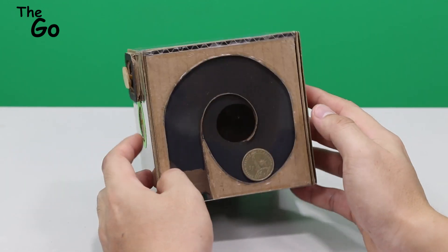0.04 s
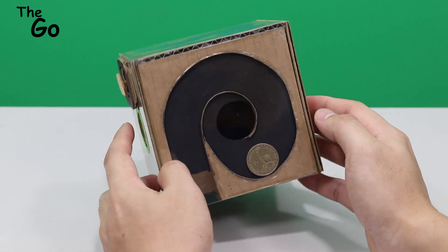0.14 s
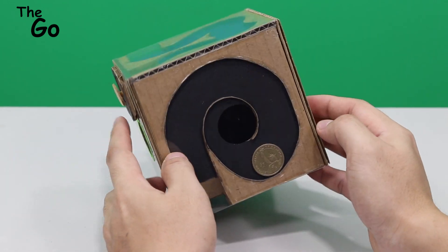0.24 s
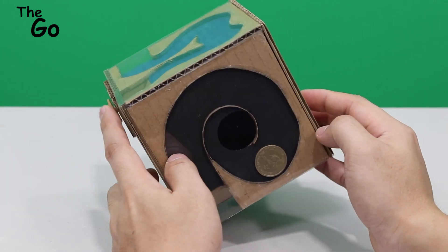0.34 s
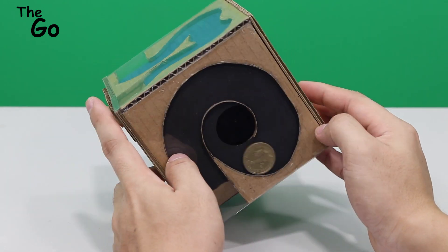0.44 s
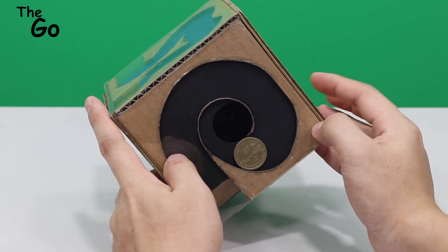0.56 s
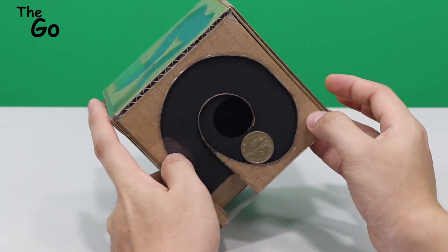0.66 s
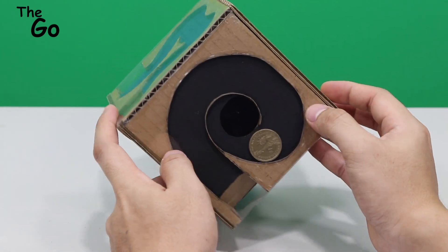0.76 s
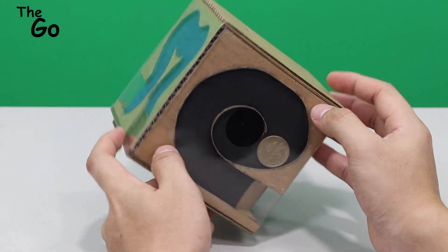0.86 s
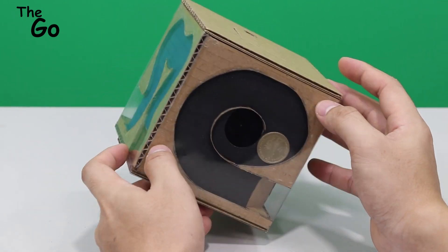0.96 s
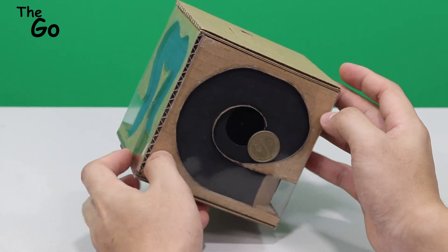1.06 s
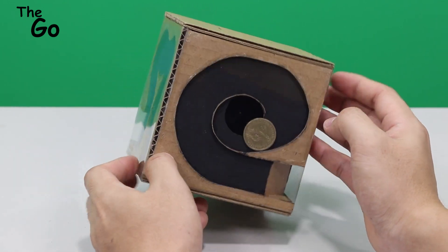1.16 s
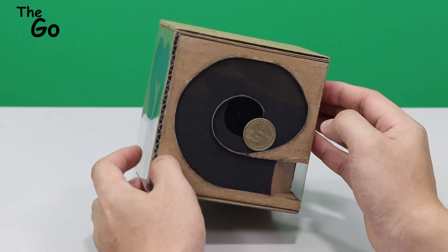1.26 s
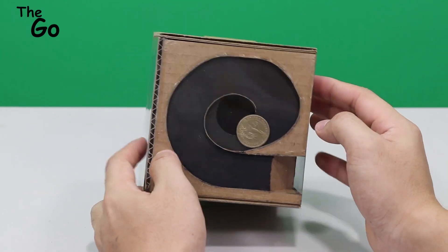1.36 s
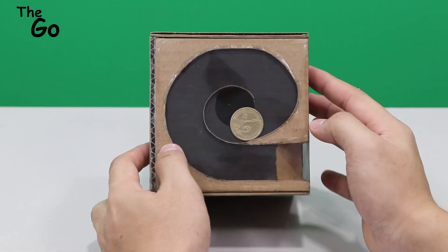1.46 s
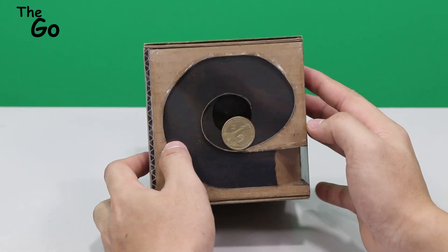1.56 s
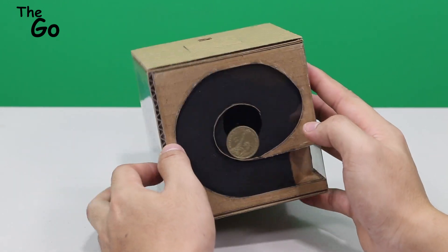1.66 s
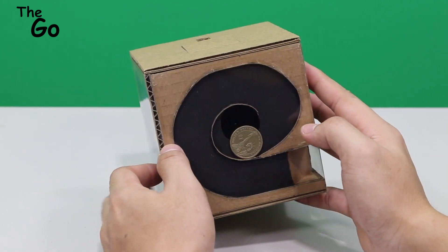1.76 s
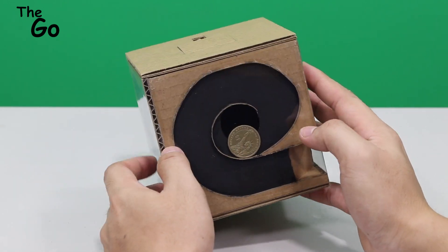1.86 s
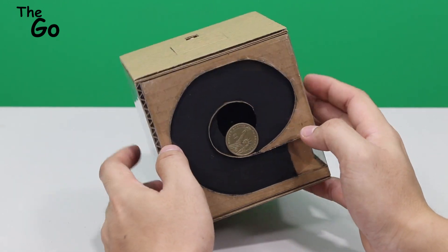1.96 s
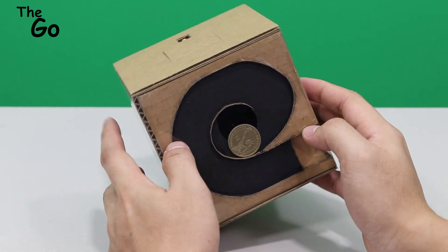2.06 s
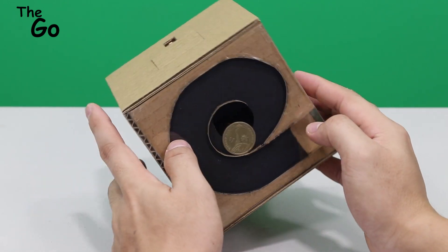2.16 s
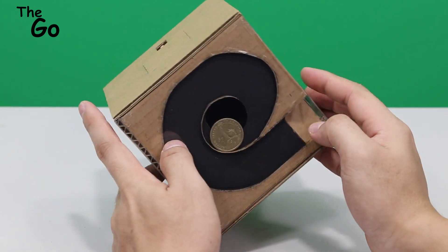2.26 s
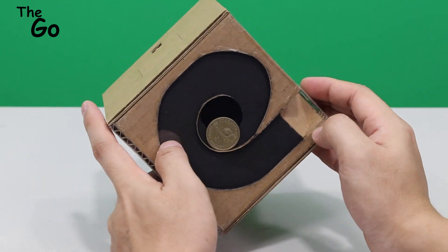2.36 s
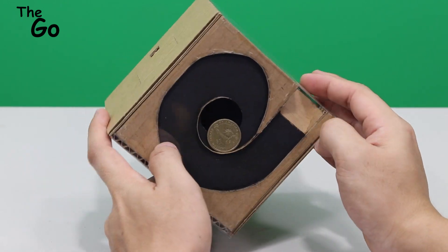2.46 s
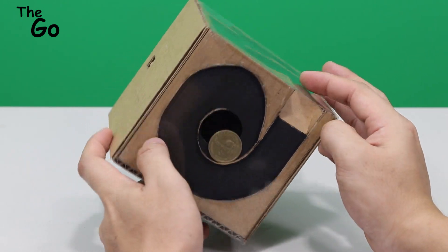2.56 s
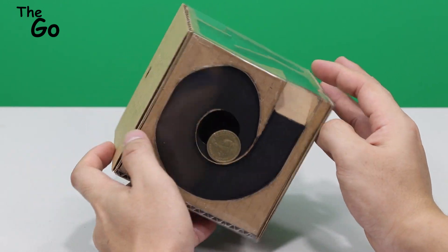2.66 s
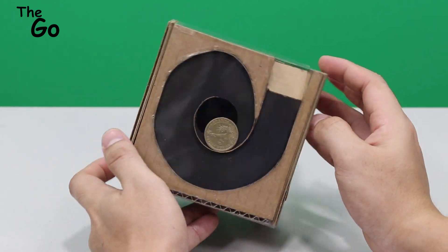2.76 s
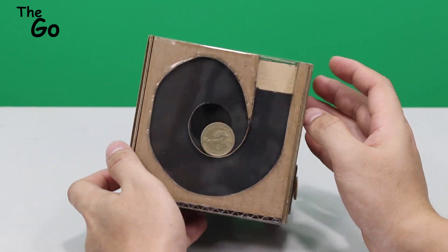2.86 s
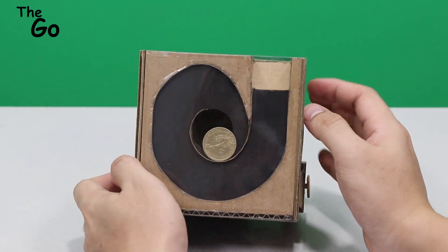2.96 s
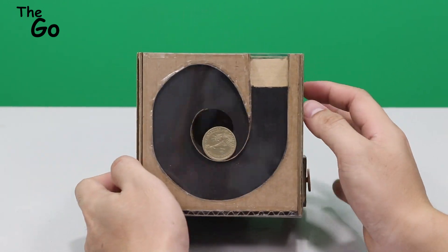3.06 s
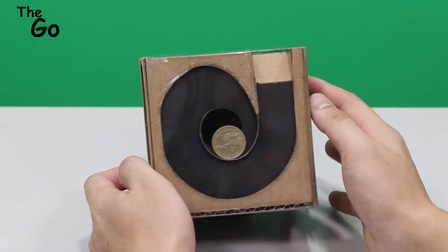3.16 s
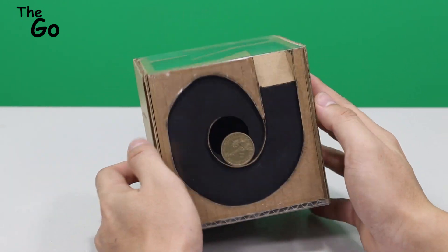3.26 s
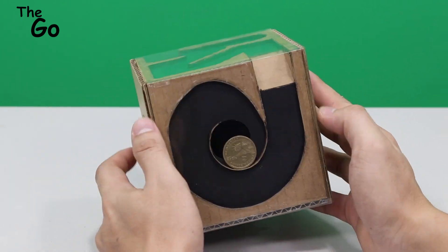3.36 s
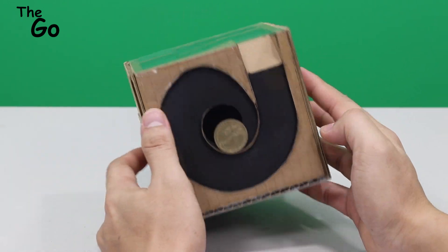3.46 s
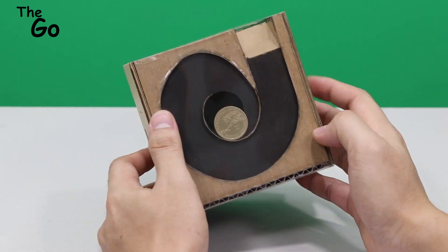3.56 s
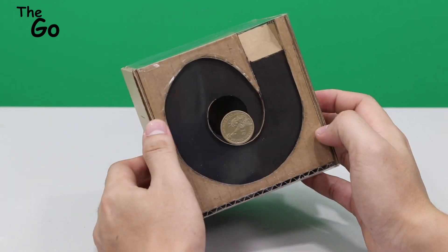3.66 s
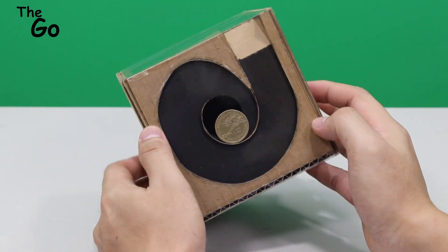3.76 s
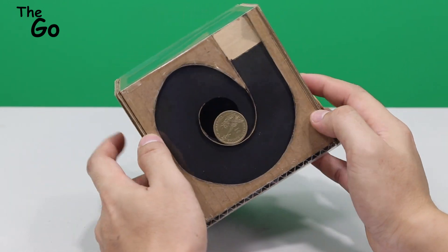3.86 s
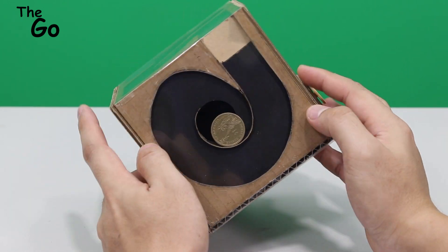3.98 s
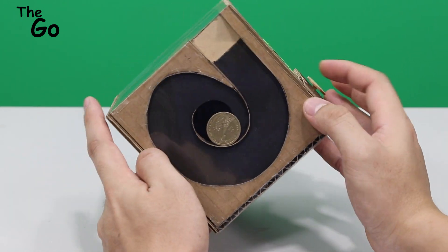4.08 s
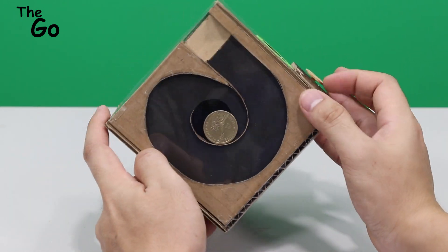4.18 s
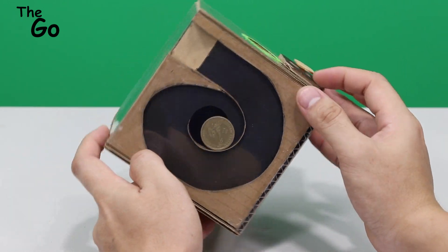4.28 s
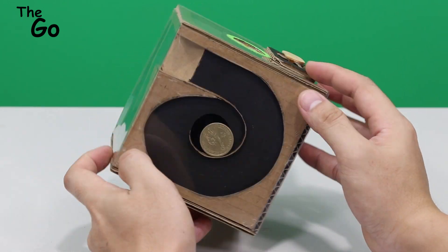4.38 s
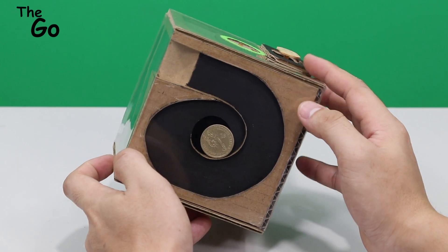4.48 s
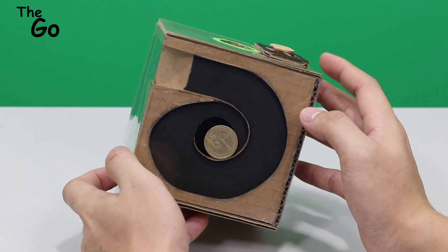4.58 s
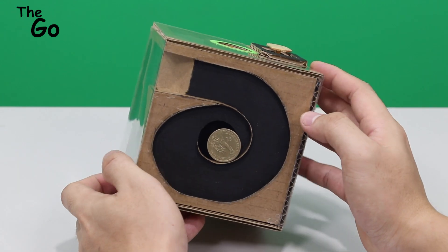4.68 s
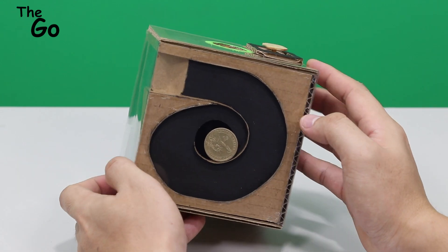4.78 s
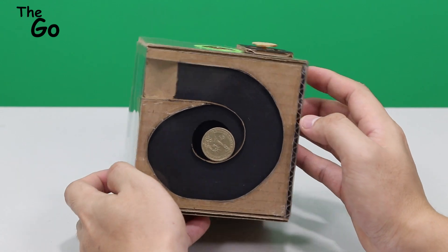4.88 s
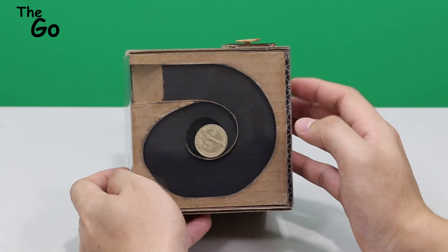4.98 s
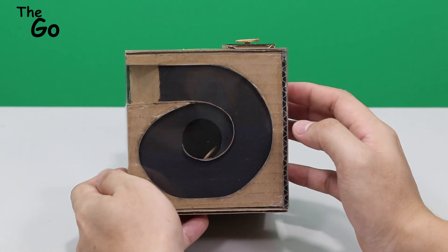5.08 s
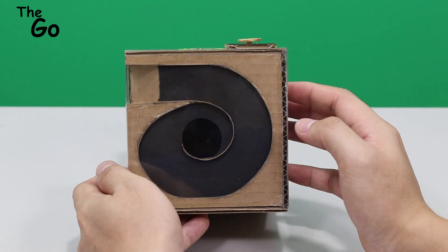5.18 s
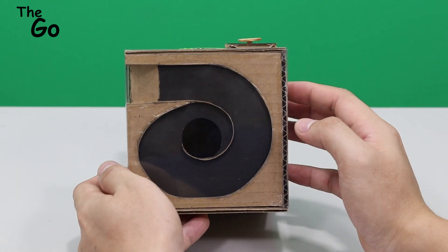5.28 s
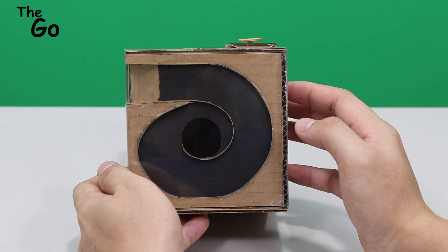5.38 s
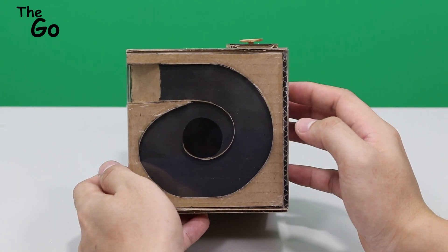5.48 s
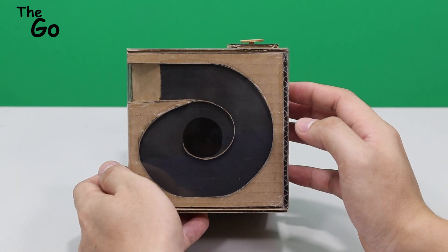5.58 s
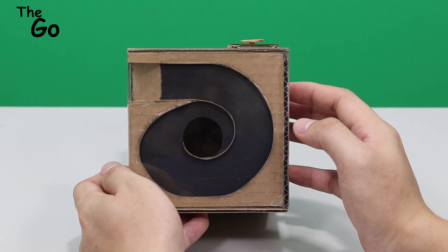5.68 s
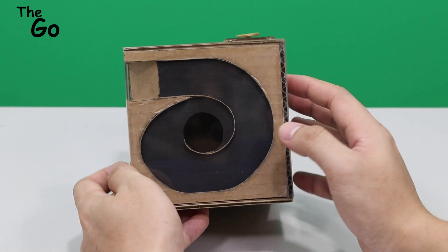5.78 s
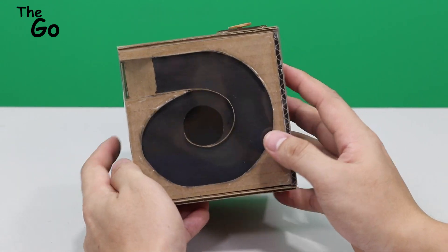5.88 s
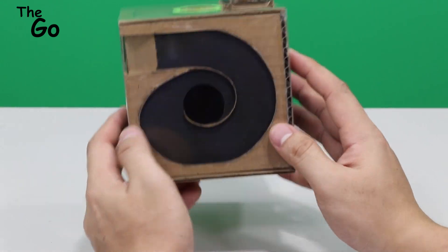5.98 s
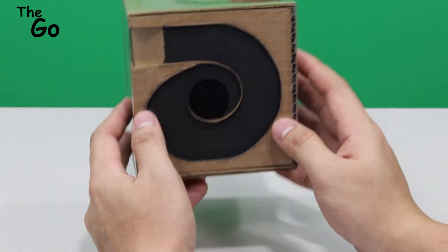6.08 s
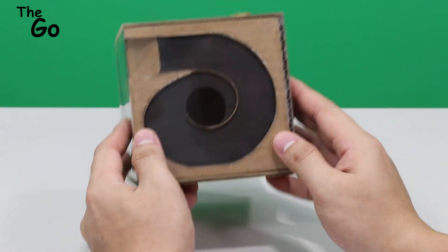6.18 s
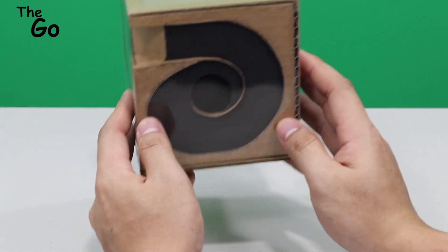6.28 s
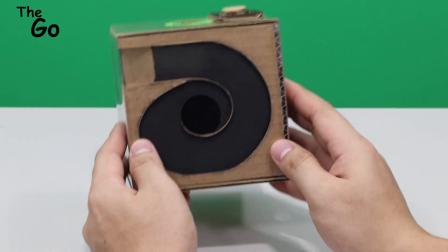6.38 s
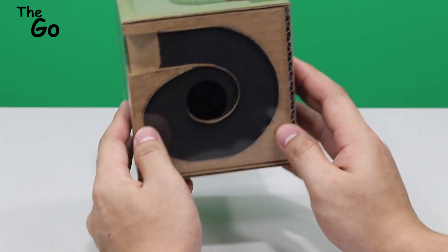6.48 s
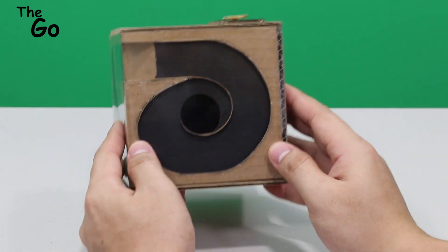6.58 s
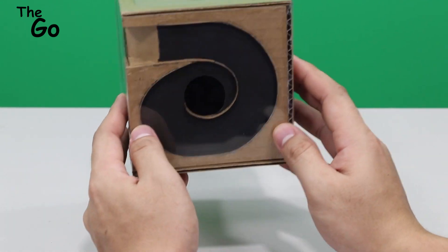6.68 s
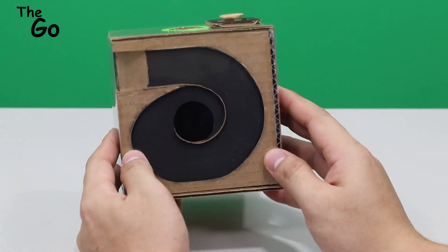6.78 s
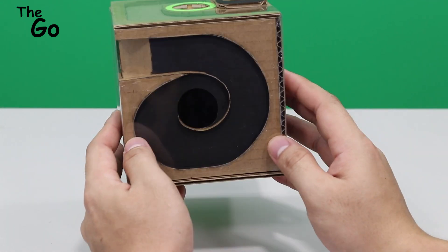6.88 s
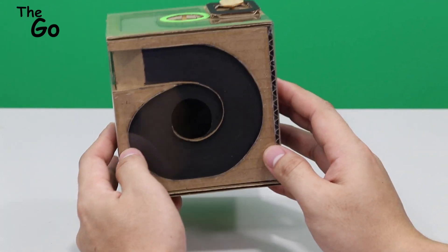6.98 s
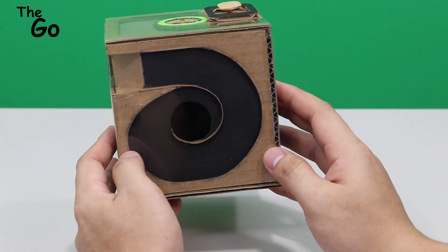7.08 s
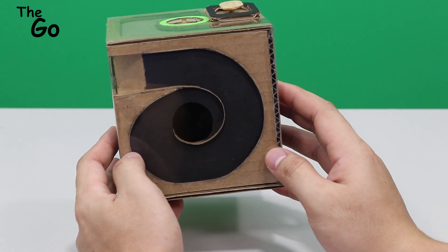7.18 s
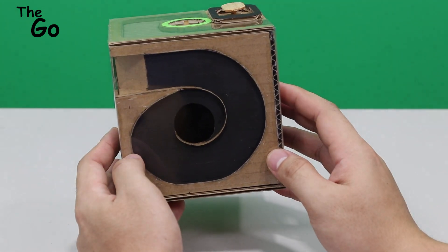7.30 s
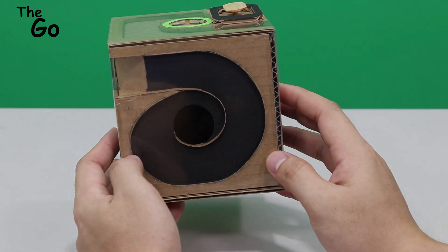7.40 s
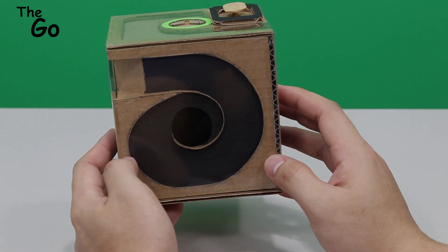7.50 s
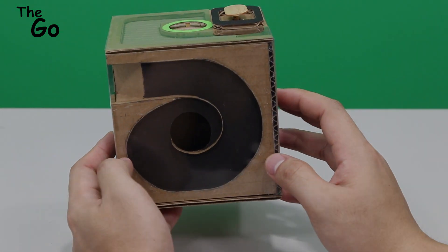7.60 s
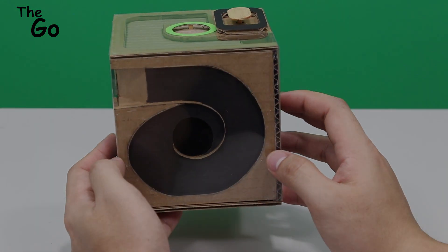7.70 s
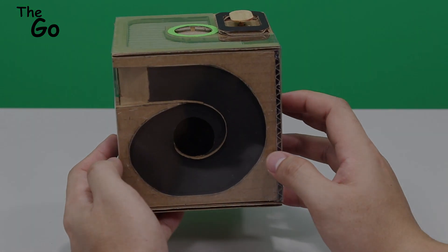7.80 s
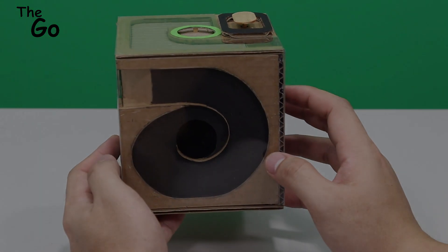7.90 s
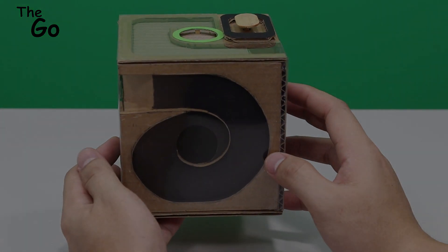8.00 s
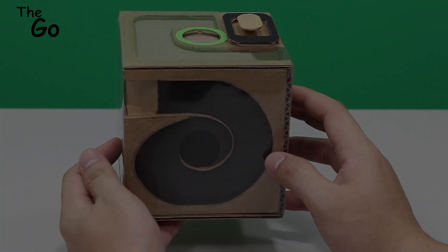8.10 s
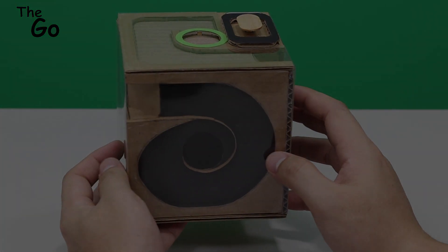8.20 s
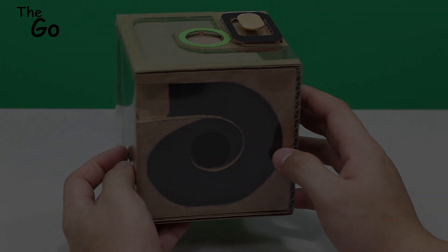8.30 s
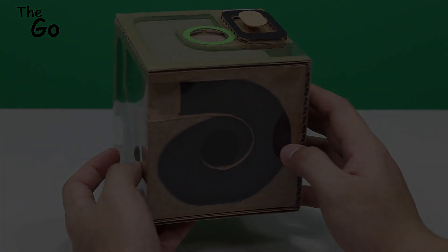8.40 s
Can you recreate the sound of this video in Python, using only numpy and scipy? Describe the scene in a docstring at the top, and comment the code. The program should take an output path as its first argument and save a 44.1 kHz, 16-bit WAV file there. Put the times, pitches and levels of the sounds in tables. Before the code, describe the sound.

Close, dry recording of a coin inside a small cardboard box in a bare room. An opening cluster of hollow knocks and brief rolling gives way to sparse taps and scuffs as hands tilt the box. A busy rattle comes midway, then a drop and tumble, then loud rapid shaking bursts that briefly clip. It dies away to low steady background noise.

```python
"""Bare room: a coin rolls, tips and knocks inside a cardboard box that two hands turn and then shake.
Knocks ring decaying wall and coin modes and crack as short noise bursts; rolling is dense grains into both.
The hands rumble as lumpy low noise; the room answers with decaying noise bands over steady background noise.
A slow gain control ducks the level after loud knocks; their first peaks overload."""
import sys
import numpy as np
from scipy import signal
from scipy.io import wavfile

SR = 44100
rng = np.random.default_rng(int(sys.argv[2]) if len(sys.argv) > 2 else 0)


def dump(signal):
    """Clip the signal to [-1, 1] and save it as 16-bit WAV at the path in sys.argv[1]."""
    limited = np.clip(np.atleast_2d(signal).T, -1, 1)
    pcm = np.round(limited * 32767).astype(np.int16)
    wavfile.write(sys.argv[1], SR, pcm)


def boost(x):
    """Linear amplitude factor 10**(x/20) for a level x in decibels (scalar or array-like)."""
    u = np.asarray(x, float) / 20
    return 10 ** u


N = 372644

# Box wall modes. Each row: frequency in Hz, relative level in dB, t60 in s.
WALL_MODES = [(176, -12, .07), (235, -9, .05), (300, -6, .05), (392, -1, .06), (490, -1, .04),
              (587, 0, .04), (666, 0, .04), (750, -1, .03), (930, -1, .025), (1080, -2, .02),
              (1180, -1, .018), (1295, -1, .015), (1440, -1, .016), (1720, 1, .022), (1950, 1, .01),
              (2250, 0, .012), (2720, 1, .014), (3300, -3, .006), (4200, -7, .005)]
# Coin modes, seven low then four high. Each row: frequency in Hz, relative level in dB, t60 in s.
COIN_MODES = [(7400, -4, .005), (8000, -4, .015), (8365, -11, .05), (8480, -8, .025), (8571, -13, .11),
              (8900, -2, .012), (9600, -2, .004), (14350, -1, .05), (14430, -1, .04), (14540, 0, .08),
              (14620, 0, .04)]
# Room response. Each row: frequency in Hz, t60 in s, left-right correlation from 0 to 1.
ROOM_BANDS = [(142, 0.6, 0.66), (373, 0.36, 0.86), (1060, 0.35, 0.46), (2750, 0.38, 0), (6480, 0.39, 0),
              (12600, 0.47, 0.6)]
LOW_COIN_MODES, COIN_SPLIT_HZ = 7, 11000


def rms_one(x):
    """Scale to unit rms."""
    return x / np.sqrt(np.mean(x ** 2) + 1e-20)


def ring(clicks, hz, t60_s):
    """Two-pole resonator: a unit click starts a decaying sine of height 1."""
    radius = boost(-60 / (t60_s * SR))
    w = 2 * np.pi * hz / SR
    return signal.lfilter([0, np.sin(w)], [1, -2 * radius * np.cos(w), radius * radius], clicks + 1e-18)


def near_hz(hz, centre_hz, width_octaves):
    """Gaussian weight of a mode by its distance in octaves from the centre."""
    return np.exp(-.5 * (np.log2(hz / centre_hz) / width_octaves) ** 2)


def by_hz(rows, column):
    """Column of a table as a function of frequency, on a log axis."""
    rows = np.array(rows)
    return lambda hz: np.interp(np.log(hz), np.log(rows[:, 0]), rows[:, column])


def bands(length, level_db, likeness, t60_s=None):
    """Half-octave bands of stereo noise, each with its level, left-right correlation and optional decay."""
    out = 0
    edges_hz = 22 * 2 ** np.arange(0, 9.6, .5)
    t = np.arange(length) / SR
    white = rng.standard_normal((2, 2, length))
    for k, (low_hz, high_hz) in enumerate(zip(edges_hz, edges_hz[1:])):
        band = signal.butter(2, [low_hz, high_hz], "band", fs=SR, output="sos")
        mid, side = signal.sosfilt(band, white[k % 2])
        hz = np.sqrt(low_hz * high_hz)
        alike = np.clip(likeness(hz), 0, 1)
        decay_db = 60 * t / t60_s(hz) if t60_s else 0
        stereo = np.sqrt(1 + alike) * mid + np.sqrt(1 - alike) * side * [[1], [-1]]
        out = out + boost(level_db(hz) - decay_db) * stereo
    return out


def grains(per_s, spread_db):
    """Uneven clicks of random sign and time; rms 1."""
    size_db = spread_db * np.minimum(rng.exponential(1, N), 5)
    sizes = boost(size_db) * rng.choice([-1, 1], N)
    return rms_one(sizes * (rng.random(N) < per_s / SR))


def papery(x):
    """Bright colour of card: no bass, a fall in the treble; rms 1."""
    x = signal.sosfilt(signal.butter(2, 1500, "high", fs=SR, output="sos"), x)
    return rms_one(signal.lfilter(*signal.butter(2, 3400, fs=SR), x) + boost(-20) * x)


def swells(start_s, length_s, level_db, rise_db_s, fall_db_s):
    """Summed gain of gestures that rise, hold and fall away, straight in dB."""
    t = np.arange(0, N, 32)[None] / SR
    early_s = np.maximum(start_s[:, None] - t, 0)
    late_s = np.maximum(t - (start_s + length_s)[:, None], 0)
    gain = boost(level_db[:, None] - rise_db_s * early_s - fall_db_s * late_s).sum(axis=0)
    return np.interp(np.arange(N) / SR, t[0], gain)


def strike(at, heights, chatter):
    """Stereo click train: each contact chatters and leans in level to the left or right."""
    clicks = np.zeros((2, N + SR))
    lags, sizes, lean_db = chatter
    for lag, size in zip(lags.T, sizes.T):
        lean = boost(np.outer([.5, -.5], lean_db))
        np.add.at(clicks, (slice(None), at + lag), size * heights * lean)
    return clicks[:, :N]


def knocks():
    """A knock drives the wall modes near its centre frequency most, cracks, and rings the coin."""
    # Each row: start in seconds, blow level in dB, centre in Hz of the wall modes struck,
    # crack level in dB re blow, low coin ring level in dB re blow.
    blows = [(0.028, -2.5, 382, -53, -32), (0.039, -5, 756, -7, -59), (0.077, 4.5, 750, -15.5, -61),
             (0.21, -8, 1700, -39.5, -26), (0.216, 0, 970, -9, -60), (0.31, -9, 554, -5.5, -28),
             (0.346, -8, 1080, -7, -41), (0.359, -13.5, 470, -13.5, -52), (0.382, -17, 600, -28, -48),
             (0.421, -38.5, 490, -22, -60.5), (0.441, -11, 1300, -5.5, -17), (0.479, -2.5, 2750, -5.5, -5),
             (0.556, -15.5, 1860, -2.5, -2.5), (0.991, -36.5, 538, 0, -13),
             (1.151, -11.5, 1010, -3.5, -0.5), (1.194, -13, 800, -2, -20), (1.545, -36.5, 900, -10, -40),
             (1.456, -28.5, 422, -21, -51.5), (1.685, -1.5, 2200, 3, -42.5), (1.756, -6, 2080, -28, -21),
             (2.109, -26, 563, -30, -47), (2.381, -23, 960, -1.5, -11), (2.355, -29.5, 1210, -3, -14),
             (2.413, 0, 870, -32, -24), (2.423, -5, 1220, 2.5, -12.5), (2.498, -11, 710, -19, -33),
             (2.557, -25, 590, -38, -41), (2.628, -12.5, 710, -9.5, -16), (2.671, -21.5, 560, 3.5, -42),
             (2.696, -16, 920, -19, -24), (2.976, -41, 900, 5.5, -23.5), (2.997, -34, 1500, 0, -4),
             (3.044, -2.5, 370, -32, -27), (3.054, -11, 364, -18, -35), (3.257, -25, 318, -20.5, -37),
             (3.306, -6, 864, -12.5, -65), (3.375, -3.5, 1870, -23.5, -29.5), (3.411, -32, 651, -42, -1),
             (3.421, -13, 666, -13, -34), (3.441, -14.5, 1395, -14.5, -10.5), (3.48, -2, 1860, -19, -23.5),
             (3.497, -11.5, 1890, -16, -29.5), (3.527, -4.5, 1950, -32, -43), (3.556, 0, 1580, -11.5, -9.5),
             (3.662, -5.5, 1390, -7.5, -52.5), (3.757, -23.5, 557, 2.5, -6.5), (3.872, -16.5, 510, -5, -48),
             (4.169, -29, 610, -9, -45), (4.215, -24.5, 579, -4.5, -30), (4.287, -18, 600, -9, -9.5),
             (4.334, -2, 1670, -4.5, -37), (4.425, -21.5, 1420, -1, -39), (4.603, -18, 420, -6, -25),
             (4.909, -25, 360, -5.5, -40), (5.062, -27, 392, -11, -42), (5.217, 3.5, 798, -16, -36),
             (5.261, 5, 1710, -23, -15.5), (5.298, -13, 816, -5.5, -28), (5.305, 6, 1740, -6.5, -9),
             (5.373, -1, 1760, -10, -34), (5.437, -11, 1110, -20, -48.5), (5.545, -12, 986, -33, -46),
             (5.56, 2, 1520, -13, -52), (5.66, -4.5, 1296, -6.5, -68.5), (5.845, -38, 577, -6.5, -39),
             (6.049, -37, 646, -1, -13.5), (6.228, -7.5, 774, -1.5, -47.5), (6.241, 4, 1580, -26.5, -29.5),
             (6.253, 0, 1170, -2, -13), (6.479, 2.5, 820, -8.5, -33), (6.491, -1.5, 646, -23, -23.5),
             (6.506, 3, 970, -10, -7), (6.515, 0.5, 686, -11.5, -43.5), (6.668, -0.5, 1390, -21.5, -10.5),
             (6.677, 11, 950, -9, -40.5), (6.685, 5.5, 1200, -29.5, -18.5), (6.704, 16, 880, -18, -23.5),
             (6.711, 6, 1050, -5, -6), (6.848, -6.5, 626, -34.5, -21), (6.873, 0, 1160, -15, -38),
             (6.893, 2.5, 590, -22, -39.5), (6.907, 5, 1170, -3.5, -30), (6.916, 5.5, 650, -39, -26),
             (6.931, 5.5, 1350, -29, -23), (7.057, -15, 1170, -28.5, -28.5),
             (7.069, -4, 1330, -12.5, -29.5), (7.086, 0.5, 844, -32, -49), (7.098, -4, 1010, -4, -27),
             (7.15, -3.5, 1150, -10.5, -26), (7.321, -16.5, 1240, -33, -68),
             (7.33, -19.5, 1120, -32.5, -65), (7.362, -17, 1050, -18.5, -58), (7.393, -13, 990, -21.5, -70),
             (7.408, -19, 920, -35, -60), (7.424, -20.5, 960, -41, -50), (8.296, -43, 480, -3, -22),
             (8.375, -29.5, 402, -27, -38)]
    walls_db, skirt_db, focus_octaves = -5.5, -17.0, .23
    spread_db, lean_db = 2.5, 2.0
    chatter_s, chatter_db, tick_db = .0025, -8.0, -22.0
    contact_hz, crack_s = 4500, .0016
    start_s, blow_db, centre_hz, crack_db, low_db = np.transpose(blows)
    # high coin modes follow the low ones in part
    high_db = .75 * low_db - 22.5
    at = (start_s * SR).astype(int)
    count = len(at)
    luck = rng.standard_normal((count, 2, len(WALL_MODES) + len(COIN_MODES) + 1))

    # a faint first touch, the full contact, then two weaker ones, a few ms apart
    gaps = rng.uniform(0.51, 1.5, (count, 4)) * [0, 0, 1, 1] + [0.0, 0.71, 0.0037, 0.037]
    lags = (np.cumsum(gaps, axis=1) * chatter_s * SR).astype(int)
    sizes = boost([tick_db, 0, chatter_db, 2 * chatter_db])[None] * np.ones((count, 1))

    out = np.zeros((2, N))
    for k, (hz, level_db, t60_s) in enumerate(WALL_MODES):
        # far modes alternate in sign, with and against the blow
        near = near_hz(hz, centre_hz, focus_octaves) + (-1) ** k * boost(skirt_db)
        heights = near * boost(blow_db + level_db + walls_db + spread_db * luck[:, 0, k])
        out += ring(strike(at, heights, (lags, sizes, lean_db * luck[:, 1, k])), hz, t60_s)
    # card gives way: the contact is soft
    out = signal.lfilter(*signal.butter(2, contact_hz, fs=SR), out)

    for k, (hz, level_db, t60_s) in enumerate(COIN_MODES):
        metal_db = low_db if hz < COIN_SPLIT_HZ else high_db
        heights = boost(blow_db + metal_db + level_db + spread_db * luck[:, 0, -1 - k])
        clicks = strike(at, heights, (lags, sizes, 2 * lean_db * luck[:, 1, -1 - k]))
        out += (-1) ** k * ring(clicks, hz, t60_s)

    # crack: bright noise under an envelope that decays within ms
    crack_lean_db = lean_db * luck[:, 1, len(WALL_MODES)]
    clicks = strike(at, boost(blow_db + crack_db), (lags, sizes, crack_lean_db))
    envelope = signal.lfilter([1], [1, -np.exp(-1 / (crack_s * SR))], clicks + 1e-18)
    return out + envelope * papery(rng.standard_normal((2, N)))


def rolling():
    """The milled rim trips over the card: dense grains into walls and coin, with a dry scuff on top."""
    # Runs along the card. Each row: start in seconds, length in seconds, wall level in dB,
    # low coin ring level in dB, high coin ring level in dB.
    runs = [(0.038, 0.5, -34.5, -65, -80), (1.218, 0.027, -44, -61, -82), (1.742, 0.075, -44, -62, -82),
            (2.388, 0.31, -33.5, -55, -76), (2.998, 0.36, -62, -65, -82), (3.42, .32, -36, -57, -75),
            (3.818, 0.025, -51.5, -56, -78), (4.332, 0.066, -34, -65.5, -76), (5.38, 0.07, -36.5, -53, -68),
            (5.528, 0.24, -51, -65.5, -83), (6.302, 0.11, -27.5, -44.5, -59),
            (6.548, 0.045, -27.5, -40, -55.5), (6.748, 0.092, -21, -39.5, -53),
            (6.938, 0.024, -29.5, -34, -64.5), (7.058, 0.075, -29, -38, -60.5), (7.2, .06, -44, -60.5, -74),
            (7.4, 0.13, -50, -74, -84)]
    # Faint rustle of the held box. Each row: time in seconds, wall level in dB.
    rustle = [(0, -56), (1.5, -56.5), (2.2, -57), (4.0, -51), (4.8, -58.5), (6.1, -55.5), (7.5, -73.5),
              (7.7, -84), (8.45, -83.5)]
    rise_db_s, fall_db_s = 258.5, 145
    rustle_coin_db, scuff_db, spread_db = -19, -12.5, 3.5
    centre_hz, width_octaves = 760, 1.4
    start_s, length_s, wall_db, low_db, high_db = np.transpose(runs)
    rustle_s, rustle_db = np.transpose(rustle)
    rustle_gain = boost(np.interp(np.arange(N) / SR, rustle_s, rustle_db))
    wall_gain = rustle_gain + swells(start_s, length_s, wall_db, rise_db_s, fall_db_s)
    low_gain = rustle_gain * boost(rustle_coin_db) + swells(start_s, length_s, low_db, rise_db_s, fall_db_s)
    high_gain = swells(start_s, length_s, high_db, rise_db_s, fall_db_s)

    walls = 0
    for hz, level_db, t60_s in WALL_MODES:
        near = near_hz(hz, centre_hz, width_octaves)
        walls = walls + near * boost(level_db) * ring(grains(500, spread_db), hz, t60_s)
    coin = [boost(level_db) * ring(grains(300, spread_db), hz, t60_s) for hz, level_db, t60_s in COIN_MODES]
    scuff = papery(grains(6000, spread_db))
    card = wall_gain * (rms_one(walls) + boost(scuff_db) * scuff)
    low_ring = low_gain * rms_one(sum(coin[:LOW_COIN_MODES]))
    high_ring = high_gain * rms_one(sum(coin[LOW_COIN_MODES:]))
    return card + low_ring + high_ring


def hands():
    """Fingers shifting on the card: a lumpy low rumble from band-passed grains."""
    # Each row: start in seconds, length in seconds, rumble level in dB.
    grips = [(0.046, .3, -39), (1.73, .03, -39.5), (2.42, .03, -40), (2.68, .14, -58), (3.097, .04, -38),
             (3.596, .04, -49), (3.867, .08, -47.5), (4.356, .3, -49.5), (4.795, .2, -51), (5.06, .04, -40),
             (5.224, .02, -58), (5.44, .05, -49.5), (6.443, .22, -78), (6.894, .05, -59), (8.328, .15, -66)]
    hold_db, rise_db_s, fall_db_s = -65.5, 168.5, 123.5
    band = signal.butter(2, [85, 260], "band", fs=SR, output="sos")
    lumps = signal.sosfilt(band, grains(per_s=320.0, spread_db=1.5))
    gain = boost(hold_db) + swells(*np.transpose(grips), rise_db_s, fall_db_s)
    return gain * rms_one(lumps)


def room(x):
    """Diffuse echoes that build up within a few ms and die band by band."""
    room_db, rise_s = -32, 0.001
    length = SR * 3 // 4
    echoes = bands(length, lambda hz: 0, by_hz(ROOM_BANDS, 2), by_hz(ROOM_BANDS, 1))
    echoes *= 1 - np.exp(-(np.arange(length) / SR / rise_s) ** 2)
    return boost(room_db) * signal.fftconvolve(x[None], echoes, axes=1)[:, :N]


def air():
    """Steady background noise, shaped band by band and set to one rms level."""
    # Each row: frequency in Hz, relative noise density in dB.
    spectrum = [(21, -41), (36, -2.5), (70, -24.5), (158, -2), (277, -7), (396, -9), (1070, -14.5),
                (1530, -21), (2680, -16.5), (4820, -43.5), (7000, -20), (9360, -25), (14500, -35.5),
                (17500, -60)]
    air_db = -51.5
    return boost(air_db) * rms_one(bands(N, by_hz(spectrum, 1), by_hz(ROOM_BANDS, 2)))


def scene():
    """Box, its room echoes, hands and background noise."""
    # a small box radiates little bass
    bass_cut = signal.butter(3, 271, "high", fs=SR, output="sos")
    box = signal.sosfilt(bass_cut, knocks() + rolling())
    return box + room(box.mean(axis=0)) + hands() + air()


def roll_off(x):
    """The treble ends steeply here."""
    return signal.sosfilt(signal.butter(12, 16410, fs=SR, output="sos"), x)


def record(dry):
    """Gain control too slow for the first peak, which clips at full scale."""
    ceiling_db, release_db_s, attack_s = -4.5, 128.5, 0.0089
    peak_db = 20 * np.log10(np.abs(dry).max(axis=0) + 1e-9)
    over_db = np.maximum(peak_db - ceiling_db, 0)
    # hold each excess, then release it at a steady rate in dB
    release_db = release_db_s * np.arange(N) / SR
    held_db = np.maximum.accumulate(over_db + release_db) - release_db
    pole = np.exp(-1 / (attack_s * SR))
    cut_db = signal.lfilter([1 - pole], [1, -pole], held_db)
    mix = np.clip(dry * boost(-cut_db), -1, 1)
    return roll_off(mix)


dry = scene()
out = record(dry)
dump(out)
```